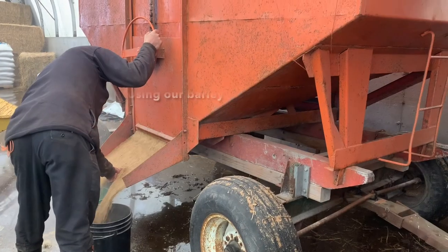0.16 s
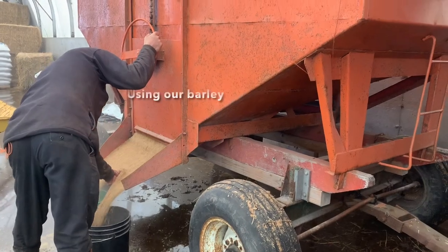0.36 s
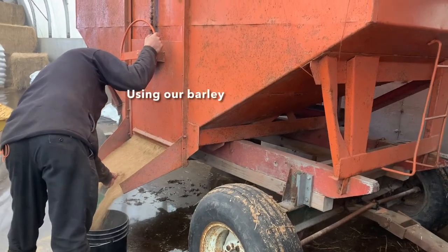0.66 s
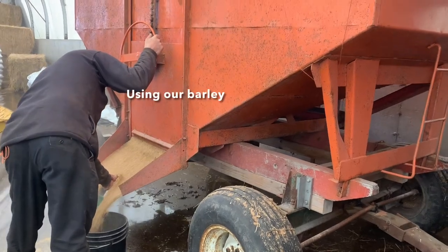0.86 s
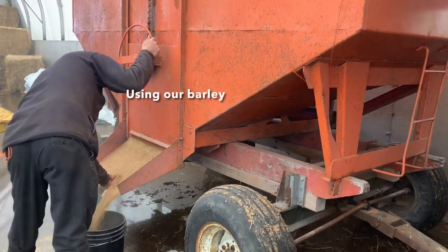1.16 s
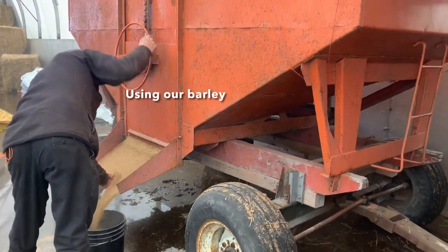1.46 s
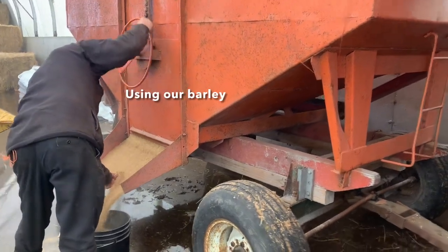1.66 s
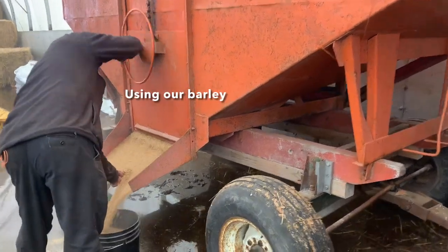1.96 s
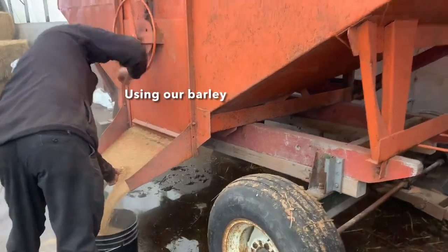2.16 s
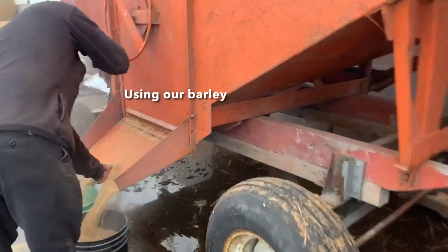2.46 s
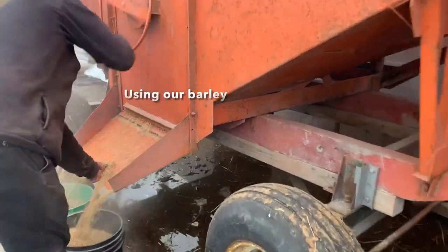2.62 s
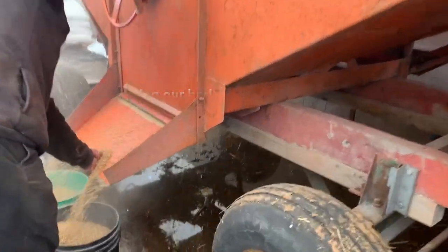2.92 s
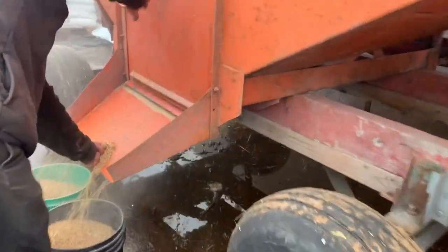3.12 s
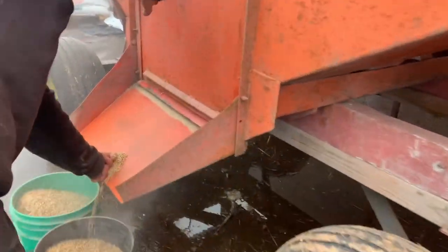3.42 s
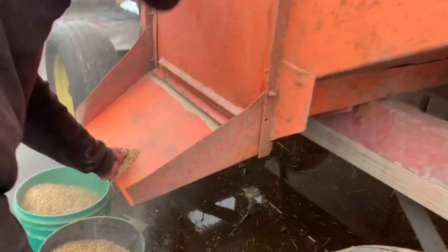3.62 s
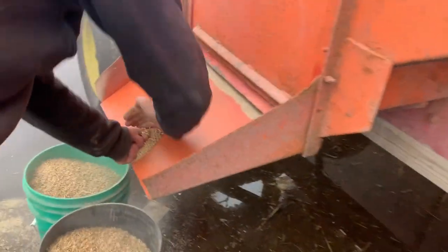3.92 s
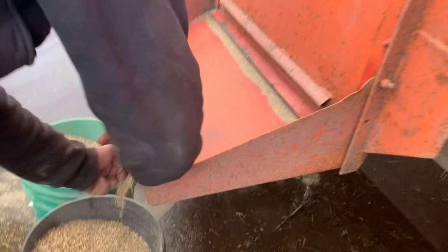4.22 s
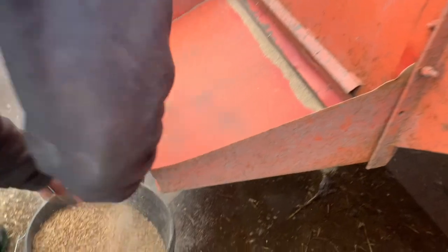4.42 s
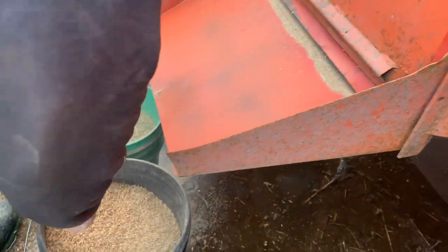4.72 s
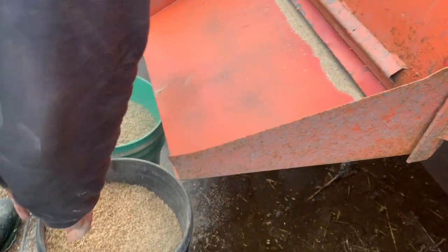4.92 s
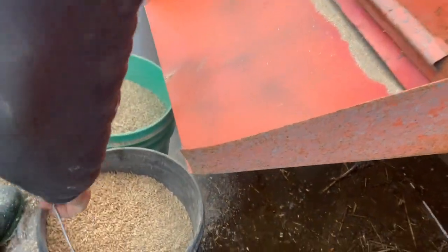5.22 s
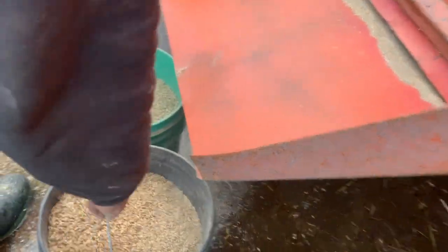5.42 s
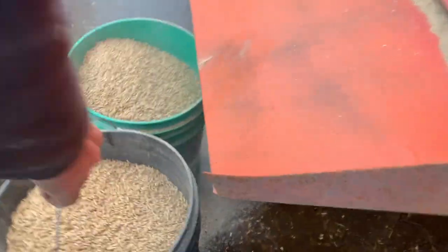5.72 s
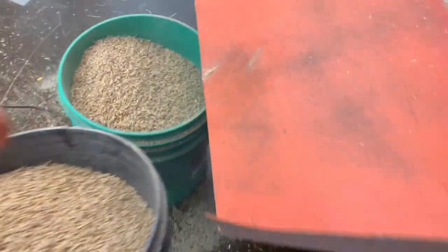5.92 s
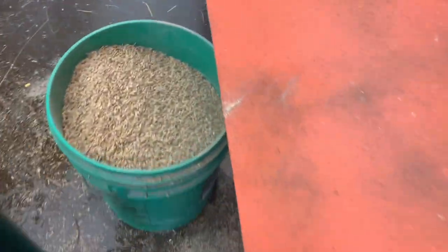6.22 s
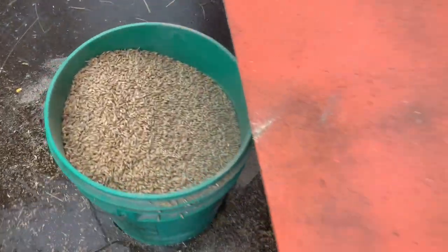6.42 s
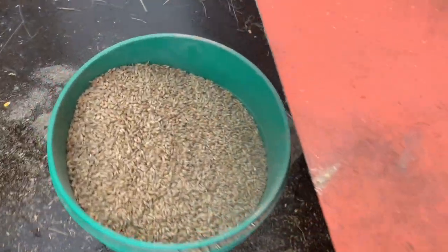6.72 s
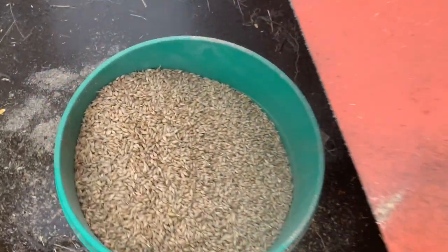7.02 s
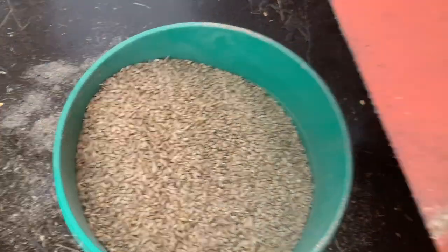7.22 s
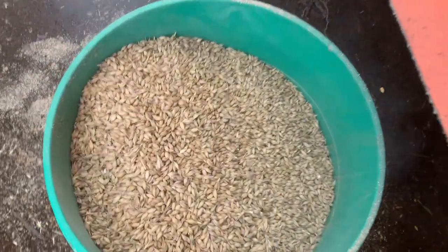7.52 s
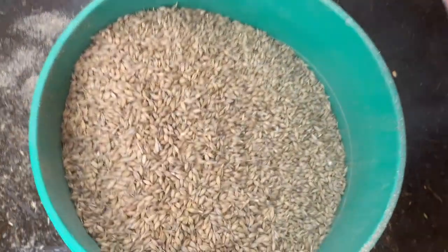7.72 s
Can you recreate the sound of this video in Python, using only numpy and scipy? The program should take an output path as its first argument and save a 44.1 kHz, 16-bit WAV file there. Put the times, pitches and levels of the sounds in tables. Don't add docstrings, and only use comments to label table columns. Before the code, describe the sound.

Dry grain hisses steadily down a steel chute onto a heap, with bright rhythmic scraping surges over the low throb of an idling engine.

```python
import sys
import numpy as np
from scipy import signal
from scipy.io import wavfile
from scipy.ndimage import uniform_filter1d

SR = 44100
rng = np.random.default_rng(int(sys.argv[2]) if len(sys.argv) > 2 else 0)


def natural_amplitude(level_db):
    exponent = np.asarray(level_db, float) / 20
    return 10 ** exponent


def to_wav(sig):
    pcm = np.clip(np.atleast_2d(sig), -1, 1) * 32767
    pcm = np.round(pcm).astype(np.int16)
    wavfile.write(sys.argv[1], SR, pcm.T)


N = 347067
CRANK_HZ = 18.71

STOPS_S = (1.8, 5.1, 6.1)


def evened(x):
    return x / np.sqrt(np.mean(np.abs(x) ** 2) + 1e-20)


def read(points, hz, axis=1):
    table = np.transpose(points)
    return np.interp(np.log(hz + 1), np.log(table[0] + 1), table[axis])


def drift(t, top_hz):
    hz = np.geomspace(top_hz / 20, top_hz, 20)[:, None]
    coarse_s = t[::128]
    waves = np.sin(2 * np.pi * (hz * coarse_s + rng.random(hz.shape))) / np.sqrt(hz)
    return np.interp(t, coarse_s, evened(waves.sum(0)))


def air_noise():
    return rng.standard_normal((2, N))


def kernels(per_s, spread_db):
    size = natural_amplitude(spread_db * np.minimum(rng.exponential(1, (2, N)), 5))
    sign = rng.choice([-1., 1.], (2, N))
    hit = rng.random((2, N)) < per_s / SR
    return evened(size * sign * hit)


def resonate(x, hz, width_hz):
    turn = np.exp(2j * np.pi * np.cumsum(hz) / SR)
    r = np.exp(-np.pi * width_hz / SR)
    return 2 * (turn * signal.lfilter([1 - r], [1, -r], x / turn)).real


def heard(drive, spectrum, patchy_db, size=1024, count=14):
    # (frequency [Hz], likeness [0-1], phase lead before the delay [rad], left-right [dB])
    ports = [(100, .999, .15, 0), (300, .94, .7, -.4), (690, .53, 1.65, -1.6), (1030, .3, 2.35, -1.6),
             (1600, .6, 2.15, -1.4), (2450, .4, 2.3, -.4), (4000, .62, 4.25, .4), (4700, .955, 3.88, 0),
             (5900, .95, 3.9, 0), (7000, .985, 4.3, 0), (8200, .965, 4.15, 0), (9500, .986, 4.25, 0),
             (10400, .955, 4.1, 0), (13200, .98, 4.3, 0)]
    # (time [s], factor [1])
    diffuse = [
        (0, 2.3),
        (3.2, 2.1),
        (3.5, .5),
        (7.87, .35),
    ]
    port_delay_s = 1 / 4150
    overlap = size * 3 // 4

    hz, frame_s, (near, far) = signal.stft(drive, SR, nperseg=size, noverlap=overlap)
    patches = rng.standard_normal(near.T.shape).T
    patches = uniform_filter1d(patches, size=count, axis=0)
    patches = evened(uniform_filter1d(patches, size=12, axis=1))

    closer = np.where(hz[:, None] > 7500, np.interp(frame_s, *np.transpose(diffuse)), 1)
    same = np.clip(1 - (1 - read(ports, hz)[:, None]) * closer, 0, 1)
    phase_rad = read(ports, hz, axis=2) - 2 * np.pi * hz * port_delay_s
    turn = np.exp(1j * phase_rad)[:, None]
    lean = natural_amplitude(read(ports, hz, axis=3) / 2)[:, None]
    left = near * lean
    right = (same * near * turn + np.sqrt(1 - same ** 2) * far) / lean
    pair = np.array([left, right]) * natural_amplitude(read(spectrum, hz)[:, None] + patchy_db * patches)
    return evened(signal.istft(pair, SR, nperseg=size, noverlap=overlap)[1][:, :N])


def facing_gain(t, level_db, share, lag_s, creep_db_per_s):
    # (time [s], gain [dB])
    facing = [(0, 0), (.4, -0.1), (.8, -0.5), (1.4, .5), (2.05, 1.5), (2.6, -0.05), (3.3, -0.4), (3.95, 0),
              (4.5, -0.6), (5.3, -1.6), (5.7, -0.9), (6.15, 1.7), (6.7, .6), (7.3, -0.4), (7.87, -0.9)]
    turn_db = np.interp(t - lag_s, *np.transpose(facing))
    return natural_amplitude(level_db + share * turn_db + creep_db_per_s * t)


def rumble(t):
    # (frequency [Hz], density [dB per Hz])
    rumble_spectrum = [(22, -55), (30, -30), (45, -5), (65, -6), (102, -2), (135, -2.5), (180, -1.5),
                       (230, -2.5), (300, -9.5), (420, -22.5), (700, -56)]
    rumble_db = (-48, -45, -44.5)
    low = heard(air_noise(), rumble_spectrum, patchy_db=0.0, size=4096, count=3)
    return natural_amplitude(2.5 + np.interp(t, STOPS_S, rumble_db) + 1.3 * drift(t, top_hz=5)) * low


def roar(t):
    # (frequency [Hz], density [dB per Hz])
    roar_spectrum = [(150, -28), (260, -6), (340, 1.5), (500, 3), (800, 1.5), (1100, 4.5), (1700, 1),
                     (2600, -4.5), (5000, -12.5)]
    throb = 1 + .03 * np.cos(4 * np.pi * CRANK_HZ * t)
    air = heard(air_noise(), roar_spectrum, patchy_db=2.5, size=2048, count=3)
    gain = facing_gain(t, level_db=-39, share=.7, lag_s=.25, creep_db_per_s=.06)
    return throb * natural_amplitude(1.77 + 0.46 * drift(t, top_hz=9)) * gain * air


def engine(t):
    # (multiple of the cycle [1], level at three stops [dB] x3, node crossing time [s])
    strong_orders = [(2, -53.5, -48, -49.5, -3), (4, -45.5, -50, -42.5, 3.5), (6, -40.5, -47, -44, 6),
                     (8, -47.5, -46, -52.5, 5.95)]
    # (multiple of the cycle [1], level at start, middle and end of the walk [dB] x3)
    weak_orders = [(3, -70, -69, -64), (4.95, -54.5, -49.5, -50.5), (7, -64, -54, -53),
                   (7.5, -70, -47, -55), (9, -64, -59.5, -57), (10, -50.5, -53.5, -55), (11, -72, -63, -63),
                   (12, -61, -58, -47.5), (12.4, -66, -53.5, -60), (14, -60.5, -57.5, -60),
                   (15, -56.5, -53, -68), (18, -62, -59.5, -73), (19, -55, -59.5, -69),
                   (20, -63, -62.5, -53)]
    walk_s = (1.4, 5.2, 7.3)
    node_depth_db, node_width_s = -10, .38

    orders = []
    cycle_rad = 2 * np.pi * CRANK_HZ * t + .015 * drift(t, top_hz=3)
    for k, *stops_db, node_s in strong_orders:
        dip_db = node_depth_db * np.exp(-((t - node_s) / node_width_s) ** 2)
        orders.append((k, np.interp(t, STOPS_S, stops_db) + dip_db + 0.6 * drift(t, top_hz=6)))
    for k, *walk_db in weak_orders:
        orders.append((k, np.interp(t, walk_s, walk_db) + 1.7 * drift(t, top_hz=4)))
    for k in range(22, 62, 2):
        orders.append((k, -63 - 0.26 * (k - 20) + 2.8 * drift(t, top_hz=5)))
    return sum(np.sqrt(2) * natural_amplitude(db) * np.cos(k * cycle_rad - .16 * k ** 2) for k, db in orders)


def knock(t):
    # (frequency [Hz], level [dB], t60 [s])
    wall_modes = [(1050, -9, .03), (1300, -3, .035), (1660, 0, .04)]
    age_s = np.maximum(t - 5.4755, 0)
    ring = sum(natural_amplitude(db - 60 * age_s / t60_s) * np.sin(2 * np.pi * hz * age_s)
               for hz, db, t60_s in wall_modes)
    return natural_amplitude(-21.5) * ring * (1 - np.exp(-age_s / 0.003))


def sweeps():
    # (share of the turn [0-1], level at start [dB], level at end [dB], brightest [Hz], timing spread [s])
    turn_sweeps = [
        (0, -0.5, 2, 8900, .008),
        (.27, -6, -2.5, 9100, 0.016),
        (.55, 1.5, -6, 9250, .015),
        (.75, -5, -7, 8600, .025),
    ]
    auger_hz, first_s = 3.31, .08
    spread_db, spread_hz = -0.6, 540

    turn, start_db, end_db, hz, spread_s = np.transpose(turn_sweeps)
    luck = rng.standard_normal((26, len(turn_sweeps), 3)).clip(-2, 2)
    s = first_s + (np.arange(len(luck))[:, None] + turn) / auger_hz + spread_s * luck[..., 0]
    db = start_db + (end_db - start_db) * s * SR / N + spread_db * luck[..., 1]
    peak = natural_amplitude(db) * facing_gain(s, level_db=-35.5, share=.3, lag_s=-.7, creep_db_per_s=.19)
    bright_hz = hz + spread_hz * luck[..., 2]
    return s.ravel(), peak.ravel(), bright_hz.ravel()


def scrape(t):
    # (frequency [Hz], density [dB per Hz])
    scrape_spectrum = [(5000, -40), (7400, -14), (8100, -.5), (8500, 0), (9200, -1.2), (10000, -2.4),
                       (11100, -3.5), (12600, -5), (14200, -6.2), (16000, -6.4)]
    steady = heard(kernels(per_s=19000, spread_db=3.5), scrape_spectrum, patchy_db=1.46)
    gain = facing_gain(t, level_db=-34, share=1.15, lag_s=-.4, creep_db_per_s=-.11)
    return natural_amplitude(1.9 + 0.28 * drift(t, top_hz=13)) * gain * steady


def surges(t):
    # (frequency [Hz], density [dB per Hz])
    surge_spectrum = [(5000, -30), (6500, -17), (7600, -12), (8500, -1), (9500, 0), (11000, -3),
                      (12500, -8), (16000, -10)]
    s, peak, bright_hz = sweeps()
    power = sum(p ** 2 * np.exp(-((t - at_s) / 0.024) ** 2) for at_s, p in zip(s, peak))
    nearest = np.searchsorted((s[1:] + s[:-1]) / 2, t)
    squeak_hz = bright_hz[nearest] + 7000 * (t - s[nearest])
    rub = kernels(per_s=11000, spread_db=-2.0)
    squeak = evened(resonate(rub, squeak_hz, width_hz=400))
    puffs = heard(rub + natural_amplitude(-11) * squeak, surge_spectrum, patchy_db=1.3)
    return natural_amplitude(1.2) * np.sqrt(power) * puffs


def stream(t):
    # (frequency [Hz], density [dB per Hz])
    stream_spectrum = [(500, -30), (1500, -10), (2400, -3.5), (3300, -1.5), (4400, -1.3), (5900, 0),
                       (7500, -.6), (8300, -3), (10000, -7), (16000, -12)]
    hiss = heard(kernels(per_s=21000, spread_db=1.5), stream_spectrum, patchy_db=-0.34)
    gain = facing_gain(t, level_db=-33.5, share=1.06, lag_s=.12, creep_db_per_s=-.12)
    return natural_amplitude(0.78 + 0.65 * drift(t, top_hz=11)) * gain * hiss


def scene():
    t = np.arange(N) / SR
    return rumble(t) + roar(t) + engine(t) + knock(t) + scrape(t) + surges(t) + stream(t)


def low_pass(x):
    return signal.sosfilt(signal.butter(12, 17090, fs=SR, output="sos"), x)


def record(dry):
    edge = signal.firwin(1023, 15760, window=("kaiser", 10), fs=SR)
    mix = signal.oaconvolve(dry, edge[None], "same")
    return low_pass(mix)


dry = scene()
out = record(dry)
to_wav(out)
```